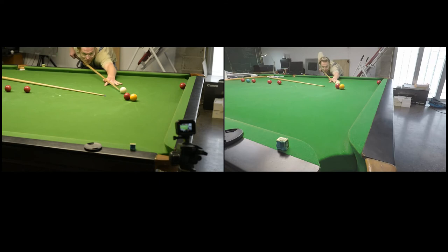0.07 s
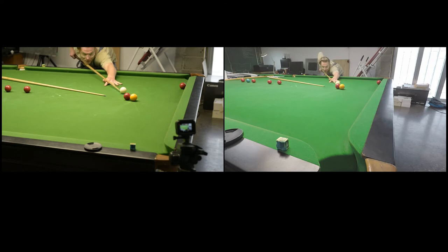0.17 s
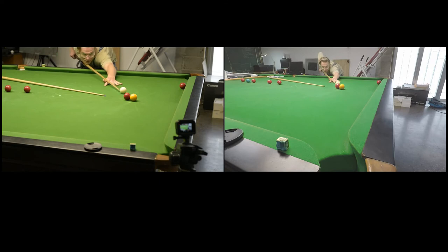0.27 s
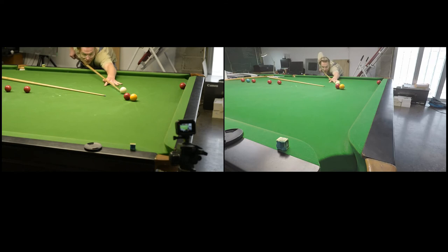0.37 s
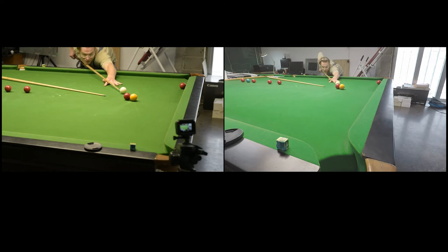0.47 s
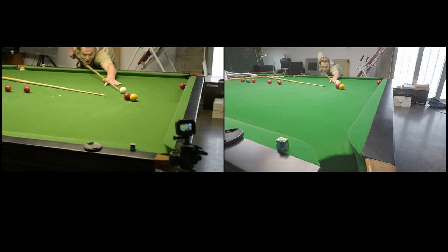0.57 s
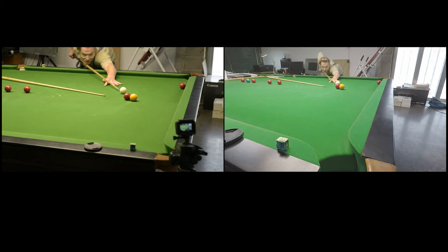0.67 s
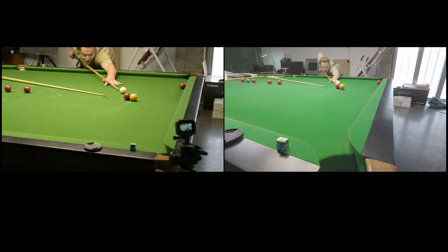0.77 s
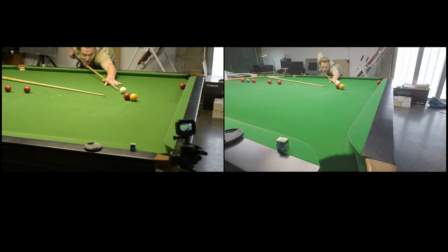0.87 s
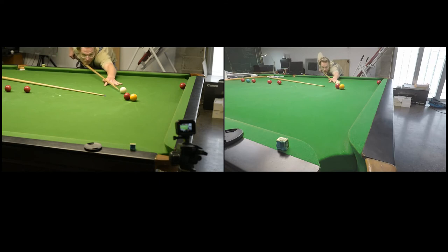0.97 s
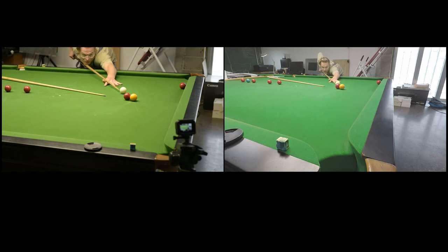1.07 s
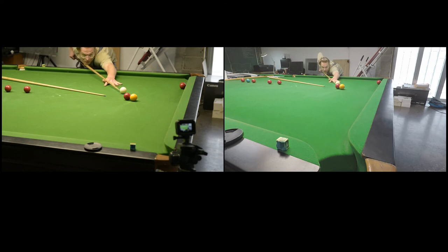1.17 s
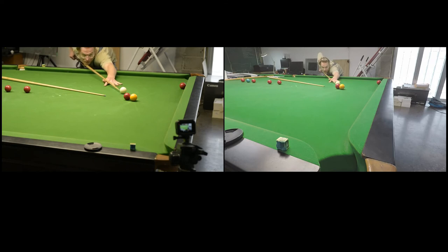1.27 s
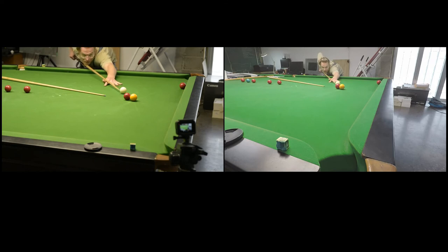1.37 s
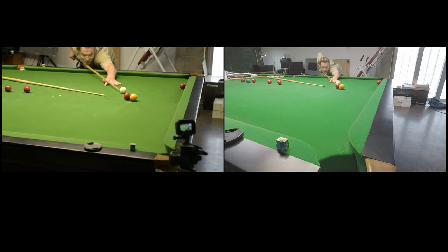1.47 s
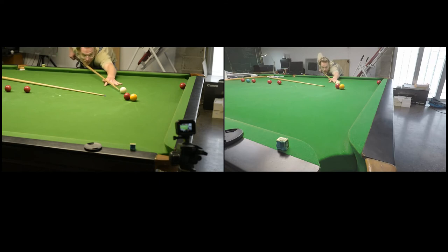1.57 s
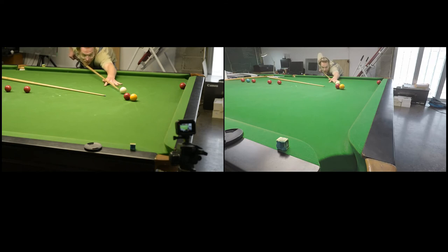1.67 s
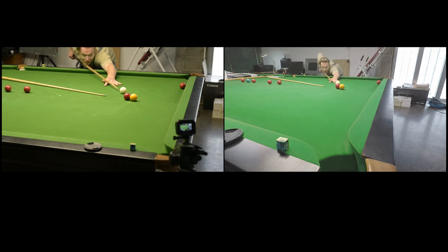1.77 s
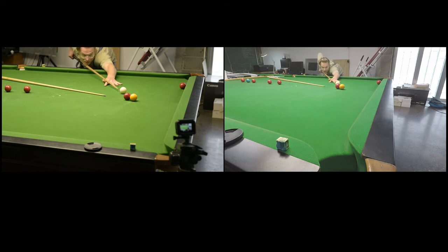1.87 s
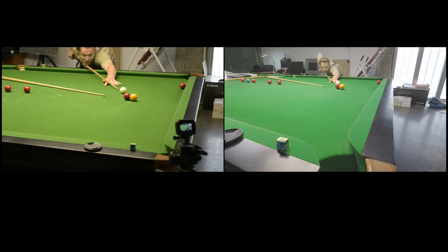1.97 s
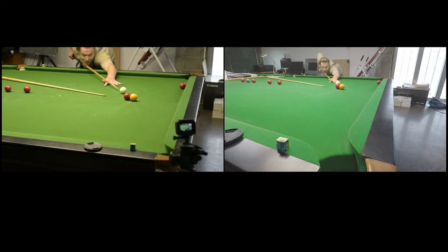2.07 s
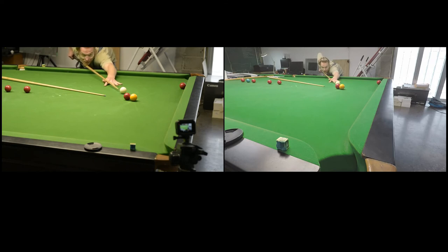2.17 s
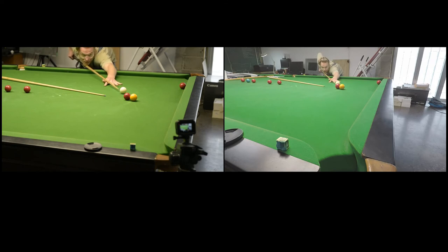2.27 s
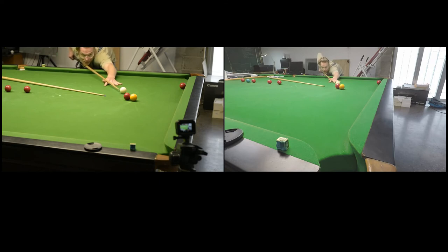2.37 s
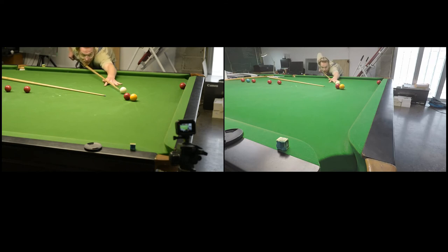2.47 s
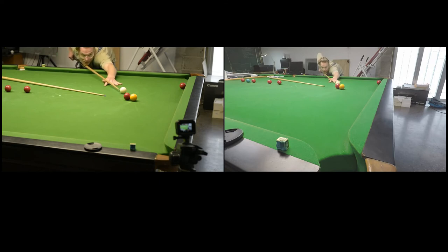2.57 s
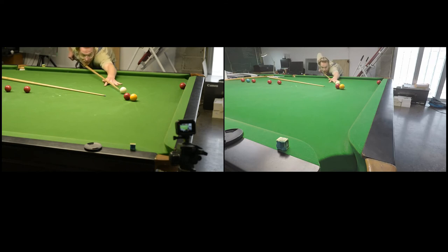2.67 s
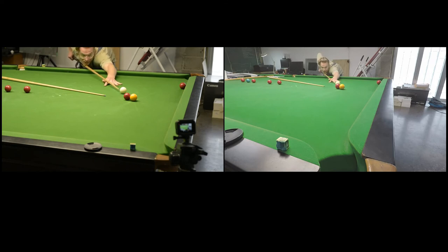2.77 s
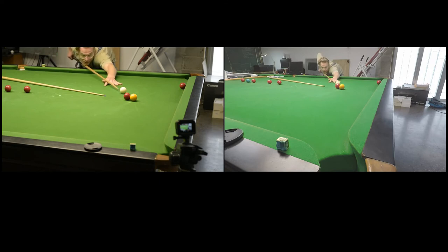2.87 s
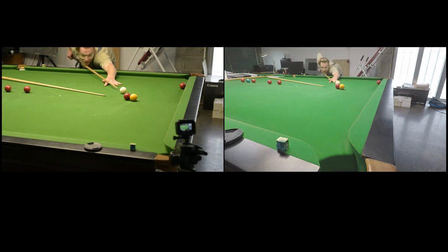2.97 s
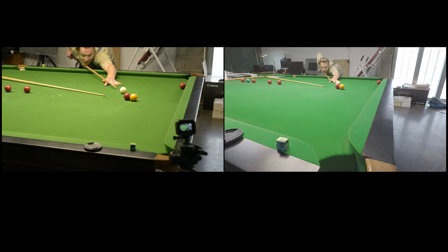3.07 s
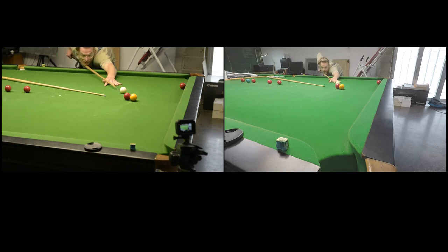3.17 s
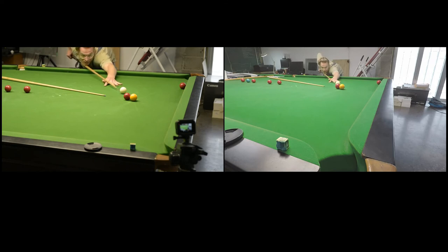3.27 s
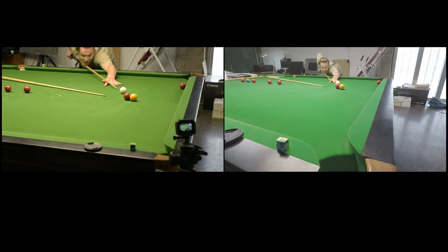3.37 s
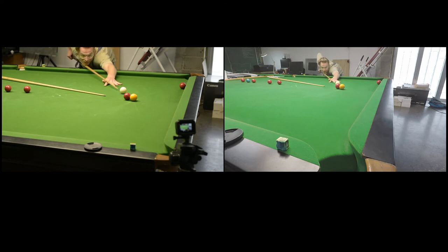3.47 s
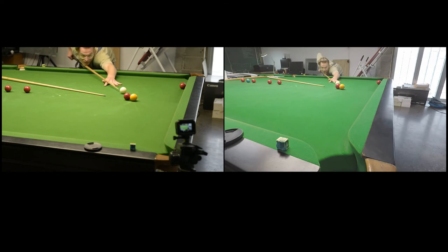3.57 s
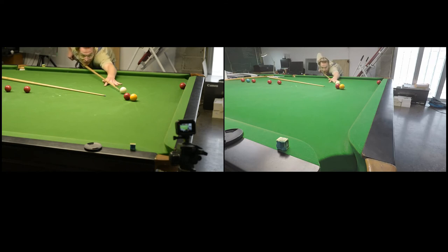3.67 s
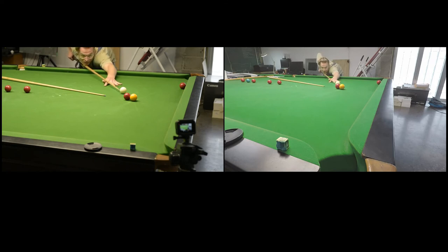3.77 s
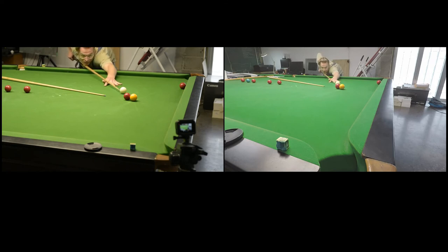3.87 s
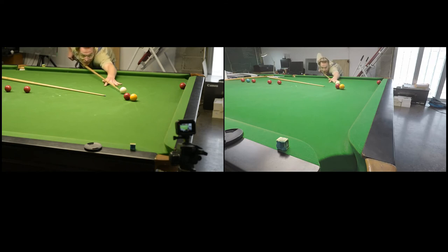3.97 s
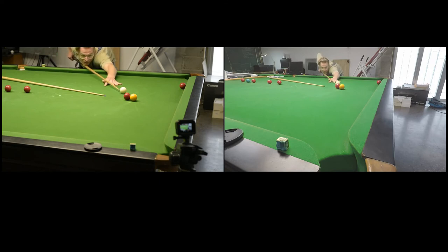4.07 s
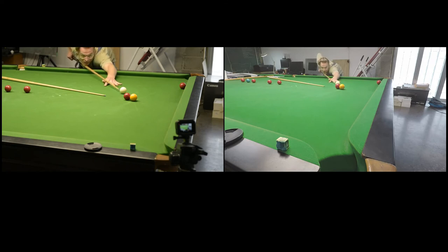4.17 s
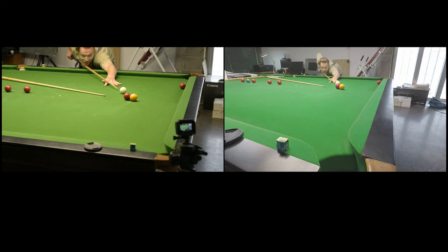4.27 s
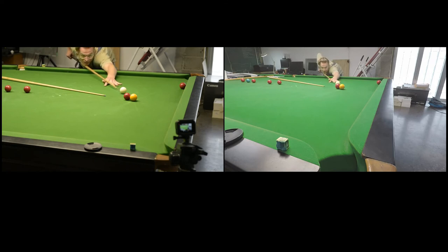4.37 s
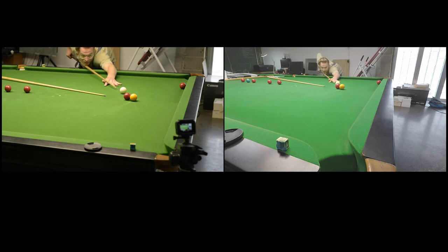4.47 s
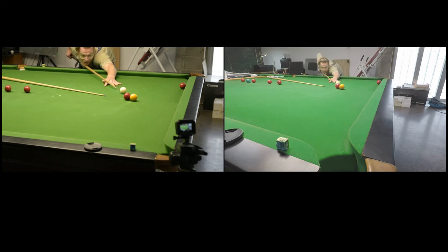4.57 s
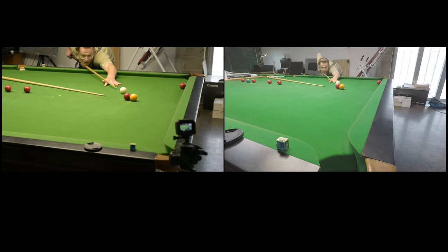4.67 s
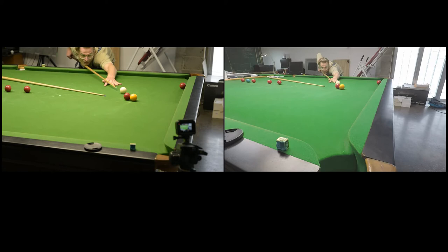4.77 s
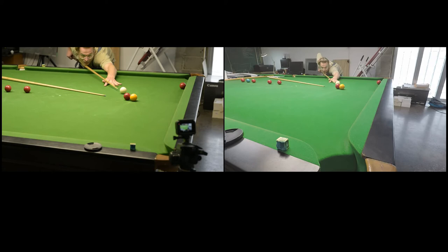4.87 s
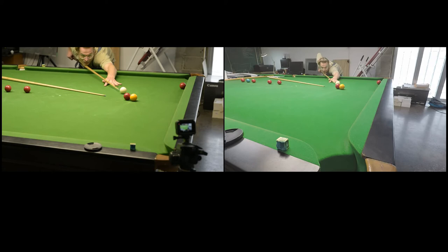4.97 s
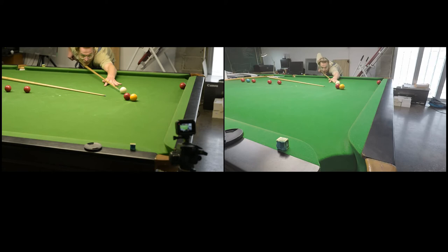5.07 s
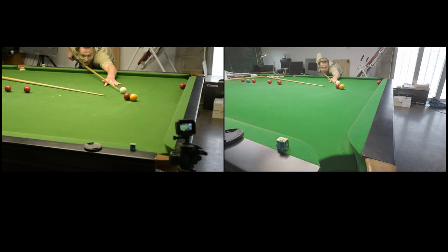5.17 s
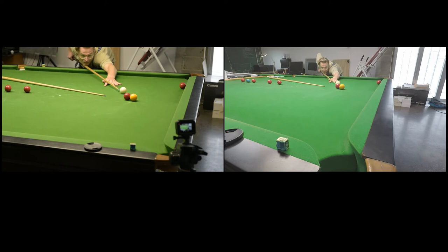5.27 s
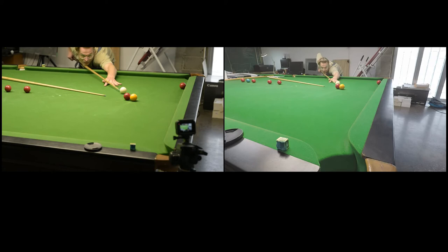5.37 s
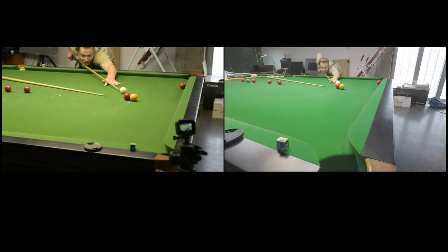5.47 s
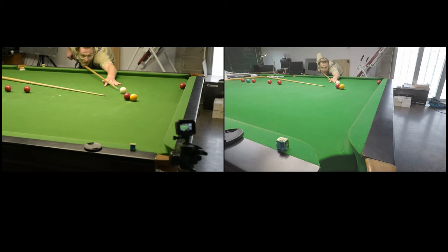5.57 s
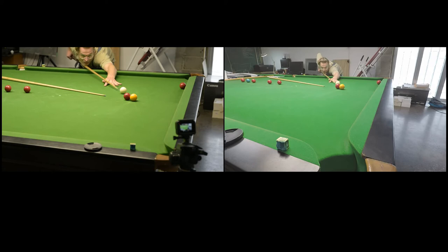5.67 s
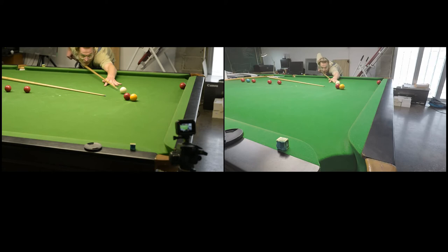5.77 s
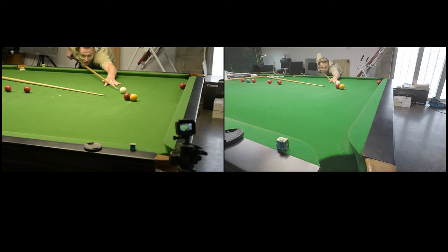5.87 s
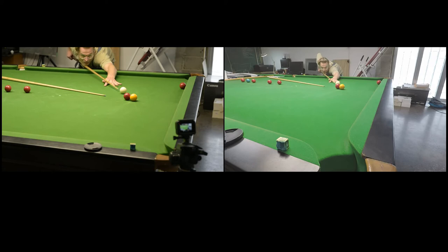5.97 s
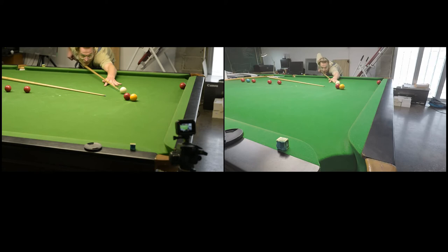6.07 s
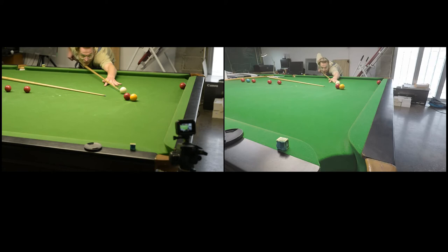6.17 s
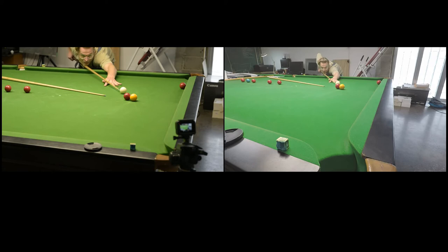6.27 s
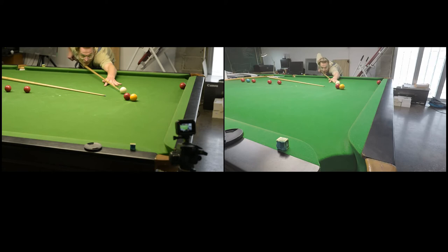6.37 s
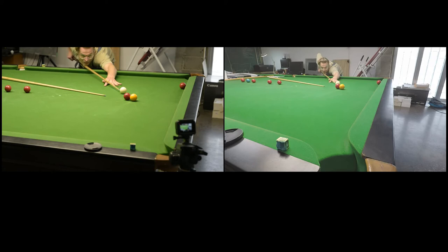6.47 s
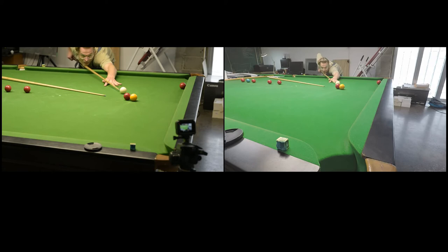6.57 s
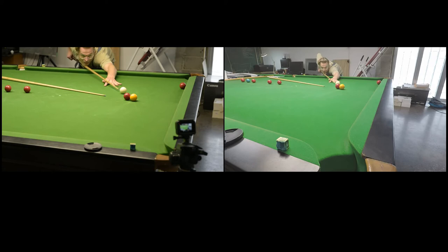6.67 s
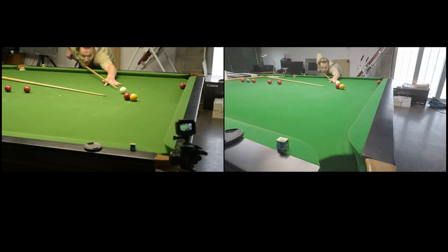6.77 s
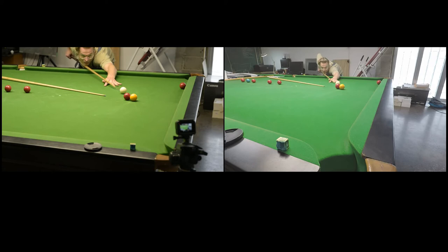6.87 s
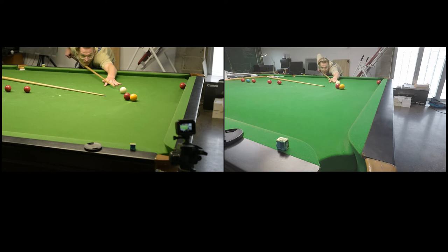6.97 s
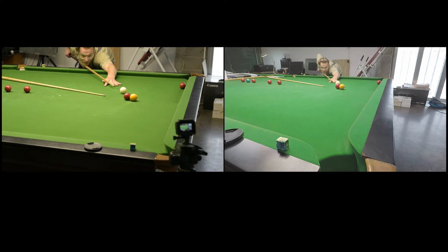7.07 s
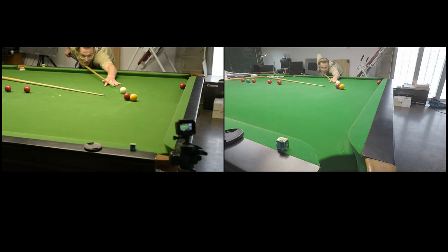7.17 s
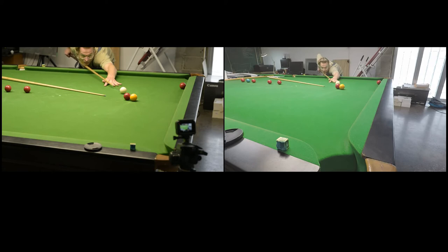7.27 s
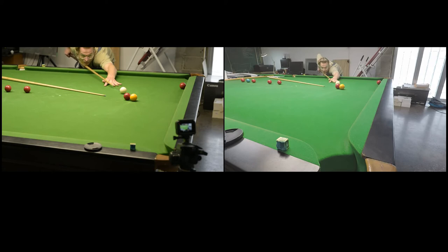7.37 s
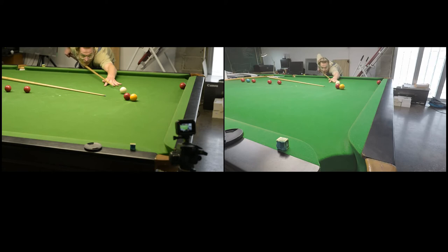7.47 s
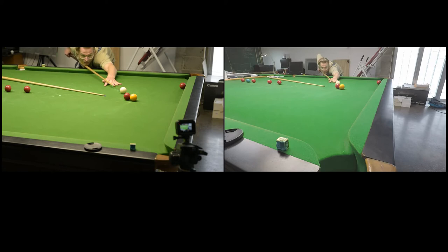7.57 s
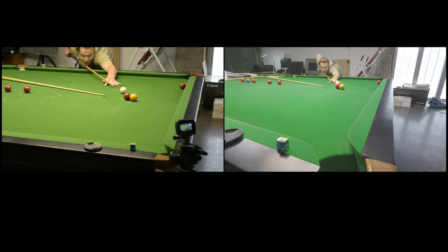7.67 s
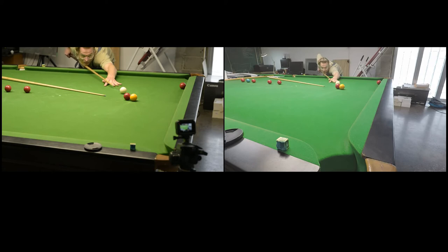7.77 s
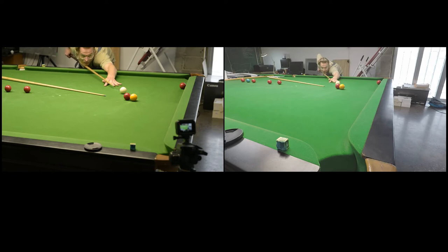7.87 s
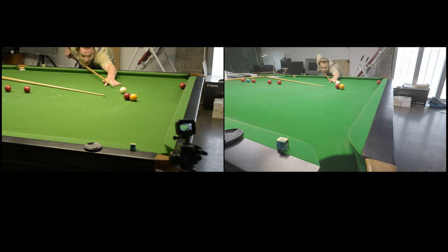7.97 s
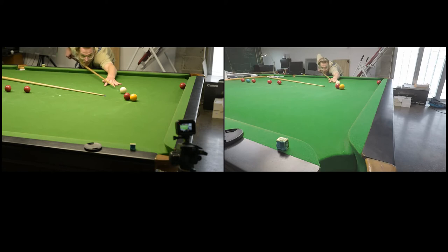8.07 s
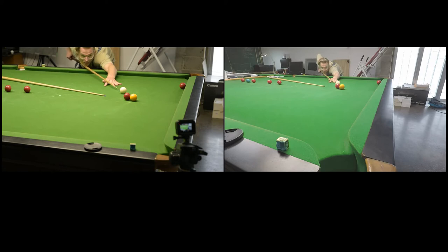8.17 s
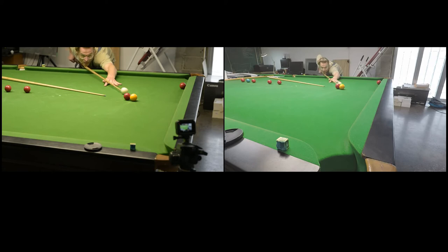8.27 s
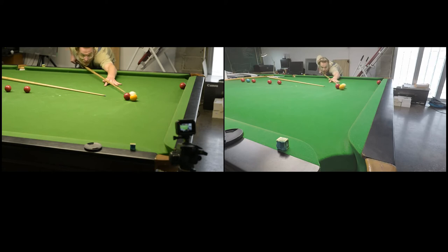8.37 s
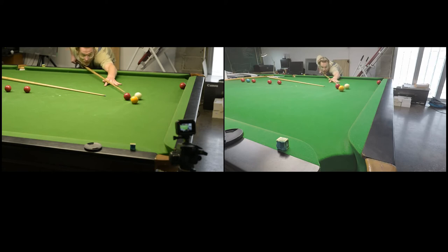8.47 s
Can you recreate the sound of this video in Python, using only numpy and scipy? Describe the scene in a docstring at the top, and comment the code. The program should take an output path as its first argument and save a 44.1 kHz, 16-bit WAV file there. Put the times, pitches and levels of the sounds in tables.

```python
"""A billiard room: over rumble, hum, whines, ticks and short hisses, a cue strikes and two balls collide.
The background is shaped noise, mains harmonics, steady sines, resonators rung by spikes and gated noise.
Each blow is a half-sine contact force through resonators; the cue adds decaying shaft modes, rattle and
cracks, the balls a bright edge. Both are convolved with a direct path, reflections and a diffuse tail."""
import sys
import numpy as np
from scipy import signal
from scipy.fft import rfft, irfft
from scipy.io import wavfile
from scipy.ndimage import uniform_filter1d

SR = 44100
rng = np.random.default_rng(int(sys.argv[2]) if len(sys.argv) > 2 else 0)


def waveform_to_disk(signal):
    """Save audio, clipped to [-1, 1], as 16-bit WAV at the path in sys.argv[1]."""
    frames = np.transpose(np.atleast_2d(signal))
    scaled = np.clip(frames, -1, 1) * 32767
    samples = np.round(scaled).astype(np.int16)
    wavfile.write(sys.argv[1], SR, samples)


def ratio_of_db(decibels):
    """Turn decibels (scalar or array-like) into linear amplitude factors; 0 dB maps to 1."""
    return 10 ** (np.asarray(decibels, float) / 20)


N = 375732
T = np.arange(N) / SR


def band(x, hz, width):
    """Two-pole resonance, with unit gain at the centre and a half-power width in Hz."""
    return signal.lfilter(*signal.iirpeak(hz, hz / width, SR), x)


def unit(x):
    """Normalisation to a root-mean-square of 1."""
    return x / np.sqrt(np.mean(x ** 2))


def stereo(left_db, right_db):
    """Amplitude ratios from decibels, as a column of left and right."""
    return ratio_of_db(np.array([[left_db], [right_db]]))


def pair(size, likeness):
    """Partial correlation: independent mid and side noise, and the weights that give this likeness."""
    mid, side = rng.standard_normal((2, size))
    c = np.clip(likeness, 0, 1)
    return mid, side, np.sqrt((1 + c) / 2), np.sqrt((1 - c) / 2)


# Spectral density of the steady background.
# Each row: frequency in Hz, density in dB per Hz, likeness of left and right from 0 to 1.
BACKGROUND_SPECTRUM = [(25, -92, .7), (60, -83.5, 1), (86, -79, 1), (101.8, -69, 0.72), (120.8, -75, 1),
                       (138, -83, 0.9), (195, -79, 0.65), (243, -84.5, 0.5), (450, -89.5, 0.1),
                       (910, -94, 0.07), (2020, -99, 0.15), (3530, -100.5, 0), (4950, -101, 0.),
                       (8140, -100, 0.), (10000, -102, 0.3), (12500, -106, 0.1), (14200, -108, 0.1),
                       (15600, -101, 0.1)]


def floor():
    """Spectral shaping of noise: ventilation rumble, largely shared, gives way to each port's own hiss."""
    log_hz = np.log(np.fft.rfftfreq(N, 1 / SR) + 1)
    at, db, likeness = np.transpose(BACKGROUND_SPECTRUM)
    mid, side, mid_weight, side_weight = pair(N, np.interp(log_hz, np.log(at), likeness))
    mid, side = mid_weight * rfft(mid), side_weight * rfft(side)
    # sqrt(SR / 2) turns white noise of rms 1 into unit density per Hz
    gain = ratio_of_db(np.interp(log_hz, np.log(at), db)) * np.sqrt(SR / 2) * (log_hz > np.log(15))
    return irfft(gain * np.array([mid + side, mid - side]), N)


# Harmonics of the mains.
# Each row: multiple of the mains frequency, left rms level in dB, right rms level in dB.
MAINS_HARMONICS = [(6, -73, -69.5), (7, -84.5, -78.5), (8, -64, -66), (10, -70, -68.5), (12, -77, -82),
                   (13, -72, -74), (14, -92, -77.5), (15, -76.5, -83.5), (16, -75.5, -77.5),
                   (17, -77.5, -82.5), (20, -80.5, -84), (22, -95, -81.5), (24, -78.5, -92), (28, -92, -79)]


def hum():
    """Harmonic series: overtones of the mains from lamps and appliances, each at a random phase."""
    mains_hz = 49.925
    out = 0
    for multiple, left, right in MAINS_HARMONICS:
        cycles = round(multiple) * mains_hz * T + rng.uniform()
        out = out + np.sqrt(2) * stereo(left, right) * np.sin(2 * np.pi * cycles)
    return out


# Steady tones of switching circuits.
# Each row: frequency in Hz, onset in seconds, left rms level in dB, right rms level in dB,
# polarity of the right relative to the left.
CIRCUIT_TONES = [(5294.13, 1.387, -61, -70.5, -1), (10588.26, 1.387, -72, -82, 1),
                 (7994.99, 0, -63.5, -70.5, -1), (11801.2, 0, -86, -81.5, 1), (15674.2, 0, -75, -74, 1),
                 (15734.23, 0, -55, -53.5, 1)]


def whines():
    """Sinusoidal oscillation: steady high tones of switching circuits, some in opposite polarity."""
    out = 0
    for hz, onset, left, right, polarity in CIRCUIT_TONES:
        tone = np.sin(2 * np.pi * hz * T) * (T >= onset)
        out = out + np.sqrt(2) * stereo(left, right) * np.array([[1], [polarity]]) * tone
    return out


# Resonances that the ticks excite.
# Each row: frequency in Hz, half the width in Hz of each of two cascaded resonators,
# left rms level of the ringing in dB, right rms level of the ringing in dB.
TICK_RESONANCES = [(5600, 400, -78, -85), (6000, 300, -77, -83), (6600, 300, -72, -83),
                   (6950, 250, -73, -78), (7600, 170, -63, -77), (7830, 200, -63, -77),
                   (8250, 300, -86, -75), (8650, 250, -74, -84), (9400, 500, -82, -77),
                   (11800, 1500, -83, -80), (13300, 700, -86, -91), (15100, 700, -81, -81)]


def ticks():
    """Impulse excitation: two current spikes every cycle ring the circuit, which hisses in the same bands."""
    period_s, spikes_ms = 1 / 50.0055, [5.6, 10.6]
    hiss_ratio = 0.7  # hiss rms over ringing rms
    cycles = np.arange(0, T[-1], period_s)[:, None]
    starts = SR * (cycles + np.array(spikes_ms) / 1000).ravel()
    # windowed sinc pulses place the spikes between samples
    at = starts.astype(int)[:, None] + np.arange(-16, 17)
    spikes = np.zeros(N + SR)
    spikes[at] = np.sinc(at - starts[:, None]) * np.hanning(33)
    out, noise = 0, rng.standard_normal(N)
    for hz, width, left, right in TICK_RESONANCES:
        ring, hiss = (unit(band(band(v, hz, 2 * width), hz, 2 * width)) for v in (spikes[:N], noise))
        out = out + stereo(left, right) * (ring + hiss_ratio * hiss)
    return out


# Bands that hiss during a burst.
# Each row: frequency in Hz, width in Hz (each of two cascaded resonators is 1.1 times as wide),
# left rms level in dB, right rms level in dB.
HISS_BANDS = [(6120, 130, -73, -72), (6750, 150, -67, -78), (7480, 200, -63, -72), (8400, 500, -65, -74),
              (8780, 100, -69, -78), (9350, 300, -72, -67), (10200, 170, -66, -69), (10820, 200, -68, -75),
              (11450, 300, -72, -82), (14900, 120, -74, -80), (15500, 300, -75, -78)]
# Beats of the burst clock that fire: each entry is a beat number, counted from 0.
FIRING_BEATS = [2, 4, 6, 7, 9, 12, 14, 16]
# Bursts that stutter: each entry is a start in seconds.
STUTTER_STARTS = [.265, 5.563]


def bursts():
    """Gated noise: about once a second the circuits work harder, with narrow hiss bands and a steady tone."""
    first_beat_s, beat_s, burst_s = 0.263, 0.4797, 0.111
    stutter_on_s, pause_s, again_s = 0.09, 0.038, 0.041
    tone_hz, tone_db = 10115.7, -67.5  # rms level
    spans = [(first_beat_s + beat * beat_s, burst_s) for beat in FIRING_BEATS]
    for s in STUTTER_STARTS:
        spans += [(s, stutter_on_s), (s + stutter_on_s + pause_s, again_s)]
    gate = sum((T > s) & (T < s + length) for s, length in spans) * 1.
    gate = uniform_filter1d(gate, size=200)  # softens the edges
    out = np.sqrt(2) * ratio_of_db(tone_db) * np.sin(2 * np.pi * tone_hz * T)
    for hz, width, left, right in HISS_BANDS:
        noise = band(band(rng.standard_normal((2, N)), hz, 1.1 * width), hz, 1.1 * width)
        out = out + stereo(left, right) * unit(noise)
    return gate * out


def contact(ms, body, db):
    """Impact force: a half-sine push rung through the body; air first hears a rarefaction. Peak level in dB."""
    t = T[:SR // 4]
    pulse = -np.sin(np.pi * np.minimum(t * 1000 / ms, 1))
    for hz, width in body:
        pulse = band(pulse, hz, width)
    return ratio_of_db(db) * pulse / np.abs(pulse).max()


# Ringing modes of the cue shaft and the table bed.
# Each row: frequency in Hz, peak level in dB, time to decay by 60 dB in seconds.
SHAFT_MODES = [(132, -40.5, 0.27), (188.5, -34.5, 0.2), (296, -38, 0.26), (445, -33, 0.23),
               (631, -35, 0.25), (848, -21, 0.24), (1037, -21.5, 0.18), (1290, -29, 0.22),
               (1625, -40, 0.22), (2150, -42, 0.16), (3657, -44, 0.25)]
# Resonances that shape the thud of the tip. Each row: frequency in Hz, width in Hz.
TIP_RESONANCES = [(480, 760), (1180, 465)]


def cue():
    """Modal decay: the leather tip thuds, the shaft rings on and rattles, the ferrule cracks faintly."""
    t = T[:SR // 4]
    ring = 0
    for hz, db, t60 in SHAFT_MODES:
        mode = np.sin(2 * np.pi * hz * t + rng.uniform(0, 2 * np.pi))
        ring = ring + ratio_of_db(db) * mode * 1000. ** (-t / t60)
    rattle = band(band(rng.standard_normal(len(t)), 2050, 1530), 2000, 1900)
    rattle = ratio_of_db(-12) * rattle * np.exp(-t / 0.03)
    crack = ratio_of_db(-32) * band(rng.standard_normal(len(t)), 6600, 6300) * np.exp(-t / 0.017)
    # a small bright tick about 25 ms after the cue strikes
    late = np.maximum(t - 0.0245, 0)
    tick = band(band(rng.standard_normal(len(t)), 10500, 4000), 10500, 4000)
    tick = ratio_of_db(-27) * tick * np.exp(-late / 0.003) * (late > 0)
    build = 1 - np.exp(-(t / 0.005) ** 2)
    return contact(0.86, TIP_RESONANCES, -6) + (ring + rattle) * build + crack + tick


# Strong first reflections.
# Each row: delay in ms (at the right port), mean level of left and right in dB, left minus right in dB.
REFLECTIONS = [(5.25, -11.5, -2.5), (6.2, -15, 0), (8.6, -21, -5), (17.55, -16.5, -1), (19.6, -11.5, -1),
               (21.6, -17.5, 1), (22.4, -20, 8), (25.1, -20, 4)]
# Bands of the diffuse tail.
# Each row: frequency in Hz, level in dB of the noise before filtering, time to decay by 60 dB in seconds,
# likeness of left and right from 0 to 1.
TAIL_BANDS = [(156, -32.5, 0.99, 1), (308, -33, 0.86, 0.94), (620, -35, 1, 0.8), (1130, -35, 0.85, 0.24),
              (1870, -41.5, 0.97, 0.5), (2830, -33, 0.78, 0.1), (3650, -37.5, 0.75, 0),
              (5800, -35, 0.79, 0.1), (7500, -32.5, 0.58, 0.2), (11000, -30, .25, .2)]


def room():
    """Impulse response: a direct path, discrete reflections, then a dense, exponentially decaying tail."""
    size = SR // 4
    t, hz = T[:size], np.fft.rfftfreq(size, 1 / SR)
    # weak reflections from furniture, one in each equal slice of time, at random sides
    count, first_ms, last_ms = 7, 3.5, 32
    weak_db, pan_limit_db = -20.5, 13
    weak = []
    for k, (at, pan) in enumerate(rng.random((count, 2))):
        ms = first_ms + (last_ms - first_ms) * (k + at) / count
        weak.append((ms, weak_db, pan_limit_db * (2 * pan - 1)))
    paths = np.zeros((2, len(hz)), complex)
    for ms, db, pan_db in REFLECTIONS + weak:
        delay = np.array([[ms + 0.05], [ms]]) / 1000  # the left port hears it 0.05 ms later
        paths += stereo(db + pan_db / 2, db - pan_db / 2) * np.exp(-2j * np.pi * hz * delay)
    # walls and cloth swallow some treble
    answer = irfft(paths / (1 + 1j * hz / 11000), size)
    # the table lies a little to the right: the left is one sample later and 1.5 dB weaker
    answer[[0, 1], [1, 0]] += ratio_of_db(np.array([-1.5, 0]))
    build = 1 - np.exp(-(t / 0.016) ** 2)
    for centre, db, t60, likeness in TAIL_BANDS:
        mid, side, a, b = pair(size, likeness)
        noise = np.array([a * mid + b * side, a * mid - b * side])
        noise = band(band(noise, centre, 0.7 * centre), centre, 0.7 * centre)
        answer += ratio_of_db(db) * noise * 1000. ** (-t / t60) * build
    return answer


# Resonances that shape the click of the balls. Each row: frequency in Hz, width in Hz.
BALL_RESONANCES = [(1775, 2740), (2435, 830)]


def balls():
    """Impact of hard resin: a very short contact that rings for two or three cycles, with a bright edge."""
    t = T[:SR // 4]
    edge = ratio_of_db(-17) * band(rng.standard_normal(len(t)), 8000, 7000) * np.exp(-t / 0.0008)
    return contact(0.27, BALL_RESONANCES, 11.5) + edge


def scene():
    """Superposition and convolution: both blows through the same room, over the background."""
    cue_s, balls_s = 8.27798, 8.40771
    out = floor() + hum() + whines() + ticks() + bursts()
    answer = room()
    for s, blow in ((cue_s, cue()), (balls_s, balls())):
        start = round(s * SR)
        out[:, start:] += signal.fftconvolve(answer, blow[None], axes=1)[:, :N - start]
    return out


def roll_off(x):
    """The treble ends steeply here."""
    return signal.sosfilt(signal.butter(12, 15745, fs=SR, output="sos"), x)


def record(dry):
    """Amplitude clipping: the crack of the balls overloads the input and is cut flat."""
    clipped = np.clip(dry, -1, 1)
    return roll_off(clipped)


dry = scene()
out = record(dry)
waveform_to_disk(out)
```